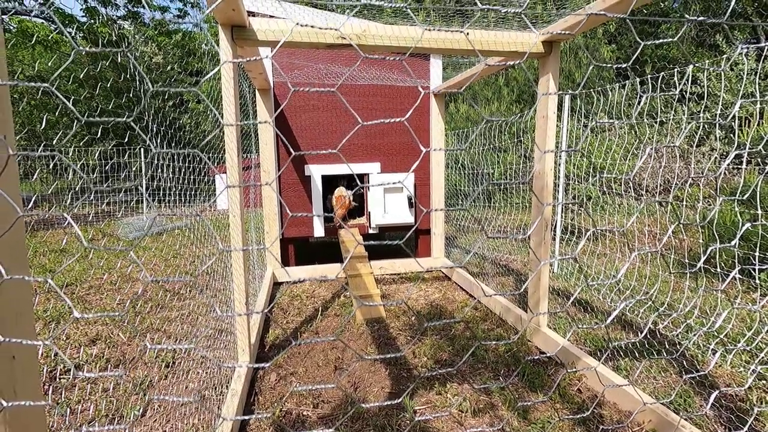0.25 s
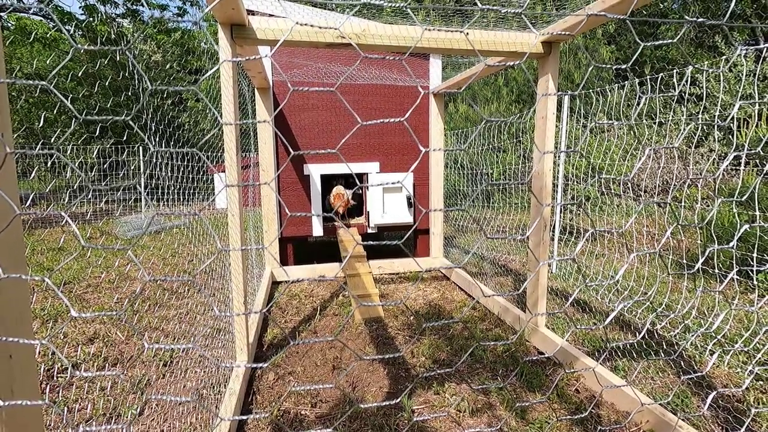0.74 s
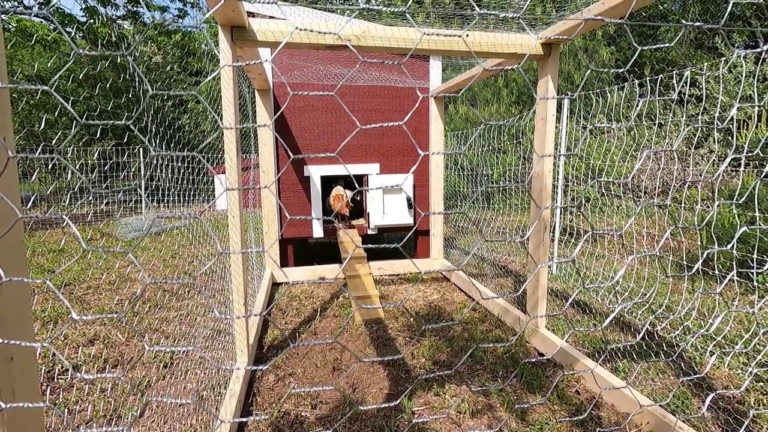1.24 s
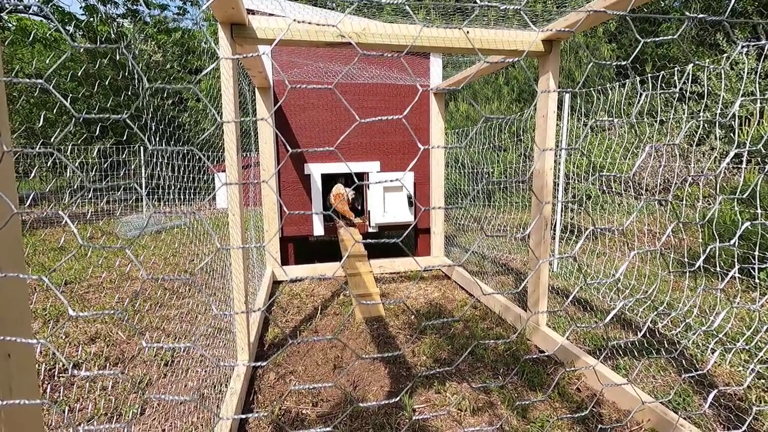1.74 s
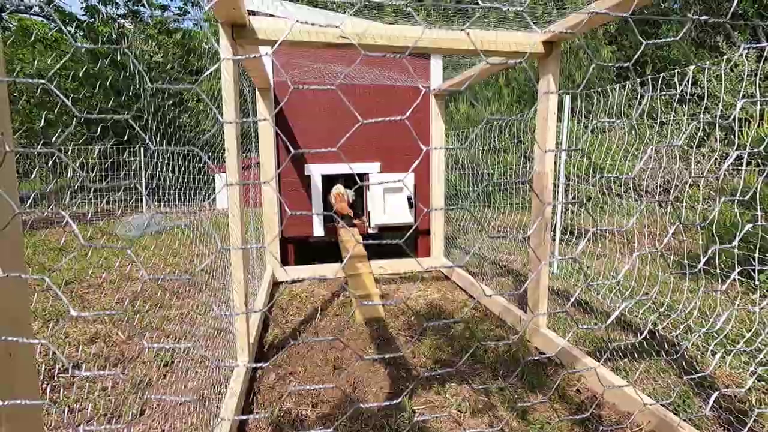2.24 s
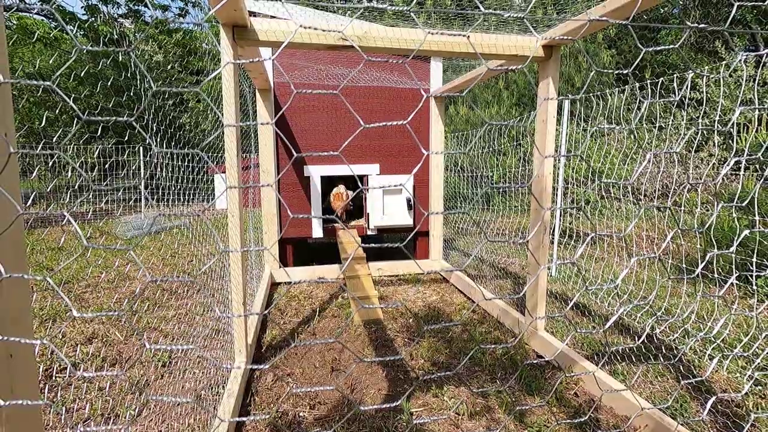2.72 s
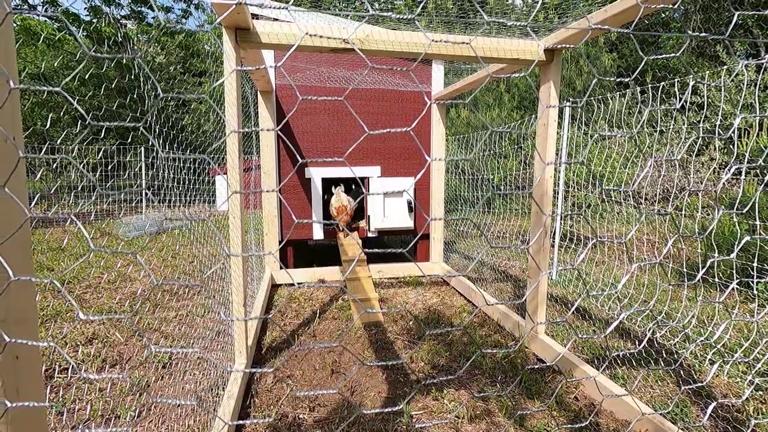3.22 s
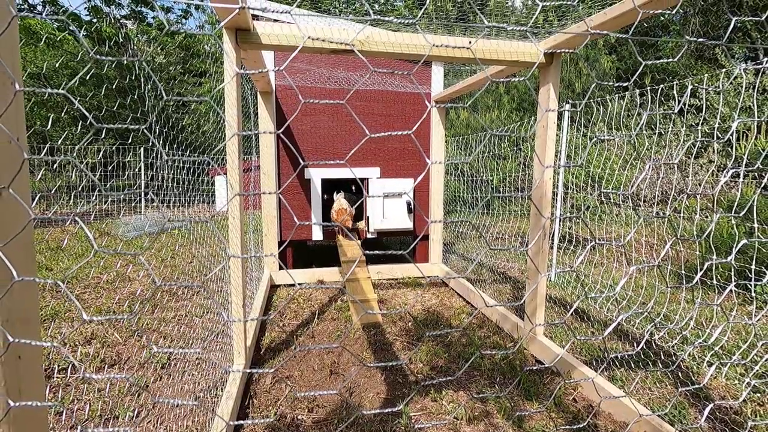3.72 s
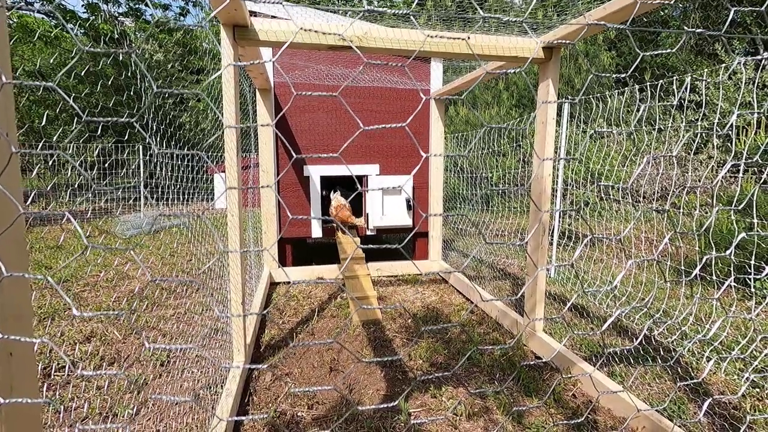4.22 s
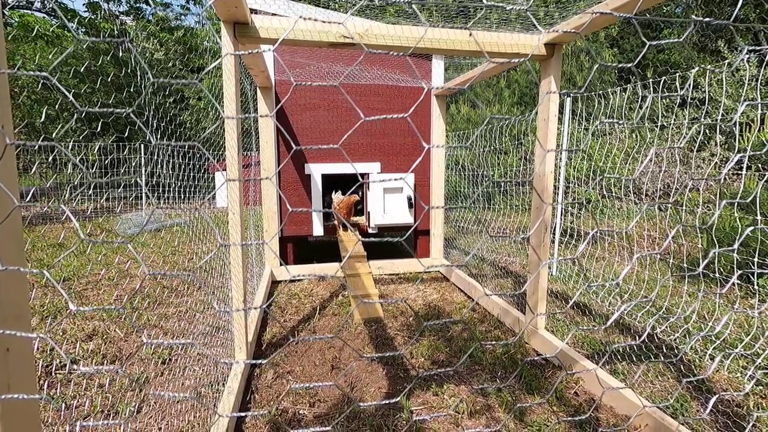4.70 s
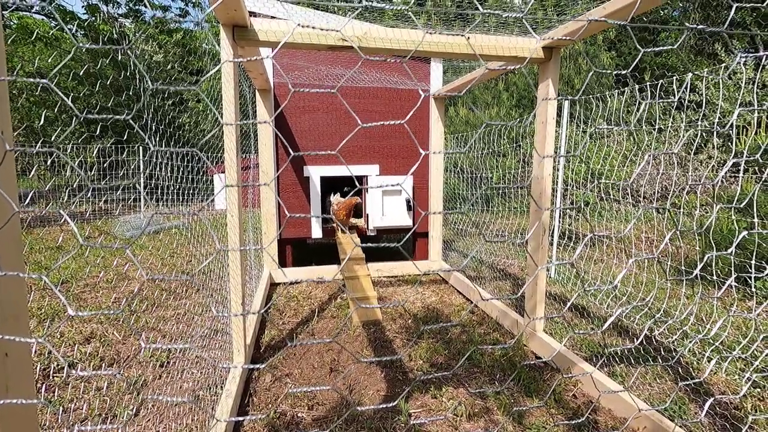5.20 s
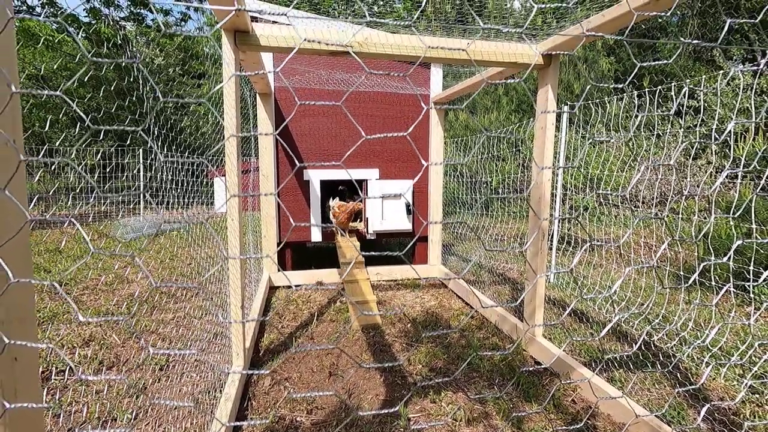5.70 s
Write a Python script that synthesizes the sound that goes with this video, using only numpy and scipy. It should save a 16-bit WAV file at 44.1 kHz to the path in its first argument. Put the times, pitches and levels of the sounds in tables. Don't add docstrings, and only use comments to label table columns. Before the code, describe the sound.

Several young chickens peep outdoors near a wooden coop. Sparse gliding cheeps and chirps come first, then a crowded flurry of falling whistles, hoarse cries and squawks around three seconds, with a woody footstep on the ramp. Calls thin into softer peeps. Crickets pulse continuously, leaves hiss, distant traffic murmurs and wind rumbles on a small camera microphone a few metres away.

```python
import sys
import numpy as np
from scipy import signal
from scipy.io import wavfile
from scipy.ndimage import uniform_filter1d

SR = 44100
rng = np.random.default_rng(int(sys.argv[2]) if len(sys.argv) > 2 else 0)


def nominal_scale(level):
    x = np.asarray(level, float) / 20
    return 10 ** x


def digitize_waveform(pressure):
    field = np.atleast_2d(pressure).T
    bounded = np.clip(field, -1, 1)
    quanta = np.round(bounded * 32767).astype(np.int16)
    wavfile.write(sys.argv[1], SR, quanta)


N = 262388

ARCHES = [
    (1.9, .15, 3770, 2170, -59.5),
    (4.08, .045, 3040, 2800, -53.5),
    (5.768, .118, 3640, 2180, -61),
    (1.672, 0.072, 3584, 3150, -56),
]
PLATEAUS = [
    (2.908, .11, 3550, 3300, -63),
    (3.183, .105, 3290, 2250, -52),
    (5.137, .1, 2944, 2100, -50),
]
BRIGHT_FALLS = [
    (2.33, .105, 3660, 1980, -53),
    (3.124, .058, 3000, 2530, -44.5),
    (4.22, .027, 2540, 2230, -42),
]
FALLS = [(4.078, .1, 3880, 3620, -66), (3.606, .018, 3200, 2950, -50), (2.972, .024, 2820, 2250, -55),
         (3.003, .027, 2260, 2000, -52), (2.99, .034, 3080, 2720, -52), (4.33, .04, 2800, 2380, -54),
         (4.728, .068, 2930, 2520, -51), (4.085, .125, 3450, 2800, -58)]
SAGS = [
    (0.122, 0.185, 3030, 2000, -59.5),
    (3.742, 0.16, 3740, 2140, -57),
    (5.51, 0.105, 3180, 2780, -57),
]
GLIDES = [
    (1.775, .028, 2980, 2400, -60.5),
    (2.712, .056, 3080, 2190, -50),
    (5.908, .034, 2920, 2000, -57.5),
    (4.452, .032, 2460, 1800, -63),
]
CRIES = [
    (2.598, 0.07, 4500, 2300, -50),
    (3.098, .028, 3700, 3030, -50),
    (3.572, 0.036, 4150, 3200, -58),
    (4.61, .036, 3530, 2700, -51),
    (5.45, .07, 3754, 2600, -56),
]
ROUNDS = [
    (4.531, .048, 2700, 2000, -50.5),
    (5.255, .097, 3230, 2410, -54.5),
]
SLIDES = [
    (1.622, 0.118, 3920, 2330, -48),
]
CHEEPS = [
    (0.645, 0.104, 4230, 2330, -47.5),
    (3.015, 0.086, 3420, 2200, -52),
]
HOOKS = [
    (0.912, 0.072, 3160, 2005, -48),
    (1.3, 0.058, 2930, 2073, -41.5),
    (2.104, .066, 2920, 2003, -45.5),
]
DROPS = [(3.18, .015, 2550, 2000, -52), (3.995, .013, 2170, 1920, -55), (4.208, .016, 2800, 2500, -49),
         (3.622, .014, 2950, 2300, -54), (4.244, 0.012, 2230, 1750, -50), (4.481, .016, 1820, 1396, -45),
         (4.678, 0.009, 1482, 950, -47), (4.81, 0.009, 2150, 1950, -47), (4.797, .012, 2500, 2150, -59),
         (5.61, 0.034, 2770, 2200, -47)]
SQUAWKS = [
    (0.12, 0.053, 2120, 1855, -46.5),
    (3.34, .04, 2020, 1653, -44),
]
WAILS = [
    (2.639, .052, 2420, 1620, -43.5),
]
SCOLDS = [(1.165, .035, 2210, 2040, -59), (2.55, 0.067, 4500, 4200, -71), (2.63, 0.083, 3820, 3770, -70),
          (2.655, .03, 4600, 3180, -60), (3.055, 0.059, 4050, 3800, -67.5), (3.32, .045, 4990, 3500, -64),
          (3.362, 0.037, 3370, 2790, -46.5), (3.5, 0.078, 3350, 2900, -62), (2.3, .03, 4080, 3650, -62),
          (3.33, .035, 3150, 3100, -58), (3.408, .014, 2600, 2920, -60), (3.05, .032, 2480, 2250, -54),
          (3.365, .007, 1700, 1550, -46), (5.46, .05, 3450, 2800, -62), (2.635, .03, 4600, 3900, -62),
          (3.55, 0.03, 3800, 3950, -61), (4.617, .048, 3000, 2200, -53), (1.17, .03, 2900, 2600, -63),
          (4.09, .04, 2100, 2000, -66), (4.25, .018, 2050, 2050, -60), (4.656, .02, 3520, 2500, -56),
          (4.68, .007, 3200, 2300, -57)]
TWITTER = [(0.028, .012, 2050, 1970, -55.5), (0.628, .027, 3770, 3740, -69), (.752, 0.029, 1285, 1280, -50),
           (.955, 0.02, 2600, 2520, -59), (1.148, 0.016, 2750, 2520, -57), (2.615, 0.022, 2480, 3150, -62),
           (3.022, .014, 2700, 2400, -60), (4.315, .016, 2600, 2800, -63), (5.25, .012, 2950, 2650, -55),
           (5.508, .014, 2100, 2800, -55), (5.75, .03, 2600, 3600, -63), (5.925, .025, 2100, 1950, -62),
           (3.292, 0.0085, 2750, 3320, -53.5), (3.398, .007, 2480, 2280, -50),
           (3.516, 0.005, 2150, 2050, -47), (3.516, .004, 1550, 1500, -49),
           (3.935, 0.041, 2670, 2350, -60.5), (4.142, .065, 2900, 2400, -60), (4.94, .03, 2173, 2240, -54),
           (4.975, 0.029, 2280, 2236, -52.5), (5.195, 0.021, 1900, 1776, -47.5),
           (5.265, 0.045, 2650, 2380, -61), (5.645, 0.033, 2300, 2290, -59),
           (5.675, 0.041, 2750, 2460, -61), (5.72, 0.022, 2240, 2050, -62), (3.79, .035, 3250, 2230, -61.5),
           (5.862, 0.048, 2980, 2960, -57), (0.001, .018, 2500, 2450, -60), (2.575, .06, 2350, 2170, -63),
           (5.768, .05, 4050, 3900, -70)]


def chicks(waver=.008, flutter_db=1.7, edge_s=.005, effort=.55, rasp_hz=550, lead_s=.025):
    # second harmonic level/dB, step per further harmonic level/dB, rasp level/dB
    kinds = [ (ARCHES, dict(rise=0.118, rise_from=.68, hold=3.0, land=.85, loudest=0.5, start_db=-4, end_db=-7),
             dict(second_db=-21.5, step_db=-15, rasp_db=-32)),
             (PLATEAUS, dict(rise=.17, rise_from=.66, hold=4.5, land=.9, loudest=.4, start_db=-3, end_db=-8),
             dict(second_db=-23, step_db=-15, rasp_db=-32)),
             (BRIGHT_FALLS, dict(rise=.04, rise_from=.97, hold=1.1, land=1.02, loudest=.35, start_db=-3, end_db=-6),
             dict(second_db=-16, step_db=-6, rasp_db=-26)),
             (FALLS, dict(rise=.04, rise_from=.95, hold=1.1, land=1.02, loudest=.35, start_db=-3, end_db=-5),
             dict(second_db=-27, step_db=-12, rasp_db=-24)),
             (CHEEPS, dict(rise=.02, rise_from=1, hold=.85, land=1.45, loudest=.47, start_db=-15, end_db=-10),
             dict(second_db=-20, step_db=-16, rasp_db=-13)),
             (WAILS, dict(rise=.02, rise_from=.99, hold=1.1, land=1.1, loudest=.66, start_db=-4, end_db=-4, crack=.3, crack_hz=2850),
             dict(second_db=-18, step_db=-12, rasp_db=-13)),
             (SAGS, dict(rise=0.1096, rise_from=0.66, hold=1.9, land=.8, loudest=0.45, start_db=-9.5, end_db=-4),
             dict(second_db=-22, step_db=-15.5, rasp_db=-30)),
             (ROUNDS, dict(rise=0.4, rise_from=.77, hold=1.2, land=1.2, loudest=.6, start_db=-5, end_db=-3.5),
             dict(second_db=-19.5, step_db=-10, rasp_db=-26)),
             (SLIDES, dict(rise=0.0187, rise_from=1, hold=.85, land=1.45, loudest=0.47, start_db=-16.5, end_db=-11),
             dict(second_db=-16, step_db=-6.5, rasp_db=-12)),
             (HOOKS, dict(rise=.2, rise_from=.75, hold=.9, land=2.1, loudest=0.9, start_db=-8.5, end_db=-14.5, crack=0.117, crack_hz=2200),
             dict(second_db=-23, step_db=-8, rasp_db=-37)),
             (DROPS, dict(rise=0.016, rise_from=0.99, hold=1.2, land=.85, loudest=0.66, start_db=-14, end_db=-3),
             dict(second_db=-19, step_db=-10, rasp_db=-25)),
             (GLIDES, dict(rise=.02, rise_from=0.93, hold=1.3, land=.75, loudest=0.63, start_db=-6, end_db=-7),
             dict(second_db=-25, step_db=-8, rasp_db=-28)),
             (CRIES, dict(rise=0.023, rise_from=1, hold=1, land=1.02, loudest=0.8, start_db=-11, end_db=-6),
             dict(second_db=-21, step_db=-6, rasp_db=-11)),
             (SQUAWKS, dict(rise=0.106, rise_from=.93, hold=1.1, land=1.29, loudest=0.25, start_db=1, end_db=-3.5, crack=0.304, crack_hz=2920),
             dict(second_db=-30, step_db=-29, rasp_db=-9.5)),
             (SCOLDS, dict(rise=.02, rise_from=.99, hold=1.2, land=1.02, loudest=.55, start_db=-3, end_db=-1.5),
             dict(second_db=-22, step_db=-11, rasp_db=-5)),
             (TWITTER, dict(rise=0.016, rise_from=1, hold=1.03, land=1.02, loudest=0.31, start_db=-4.5, end_db=-4),
             dict(second_db=-28, step_db=-8, rasp_db=-32))]
    out = np.zeros((2, N + SR))
    wavering, fluttering = drift(118), drift(65)
    lowpass = signal.butter(2, rasp_hz, fs=SR, output="sos")
    breath = signal.sosfilt(lowpass, rng.standard_normal((2, N)))
    beak = [drift(18) for k in range(4)]
    breath = rms_one(breath) * nominal_scale(3.6 * drift(140) - 6.0)
    calls = [(*call, shape, voice) for rows, shape, voice in kinds for call in rows]
    pans_db = rng.normal(1.0, 2.2, len(calls))
    for (s, length_s, top_hz, end_hz, peak_db, shape, voice), pan_db in zip(calls, pans_db):
        t = np.arange(max(s - lead_s, 0), min(s + length_s + lead_s, (N - 2) / SR), 1 / SR)
        at = (t * SR).astype(int)
        unsteady = 1 + 6 * nominal_scale(2 * voice["rasp_db"])
        share = np.clip((t - s) / length_s, 0, 1)
        hz, fade_db = contour(share, top_hz, end_hz, **shape)
        smooth_hz = uniform_filter1d(hz, size=140, mode="nearest")
        pitch = smooth_hz * (1 + waver * unsteady * wavering[at])
        phase = 2 * np.pi * np.cumsum(pitch) / SR
        over_db = voice["second_db"] + effort * fade_db
        tone = np.sin(phase)
        for k in range(4):
            overtone_db = over_db + voice["step_db"] * k + 2.26 * beak[k][at]
            tone = tone + nominal_scale(overtone_db) * np.sin((k + 2) * phase)
        edges = np.clip(np.minimum(t - s, s + length_s - t) / edge_s + .5, 0, 1)
        level_db = peak_db + fade_db + flutter_db * unsteady * fluttering[at]
        peep = np.sqrt(2) * tone * edges * nominal_scale(level_db)
        haze = breath[0, at] * np.sin(phase) + breath[1, at] * np.cos(phase)
        peep += haze * nominal_scale(peak_db + voice["rasp_db"]) * np.sqrt(np.hanning(len(t)))
        add(out, t[0], peep * nominal_scale([[pan_db / 2], [-pan_db / 2]]))
    return out[:, :N]


def contour(share, top_hz, end_hz, rise, rise_from, hold, land, loudest, start_db, end_db, crack=0, crack_hz=0):
    # f/Hz, level/dB
    throat = [(1500, 5.5), (2050, 5.5), (2400, 2.5), (2850, 3.5), (3300, 1), (4000, -1.5)]
    falling = np.clip((share - rise) / (1 - rise - crack), 0, 1)
    fall = 1 - (1 - falling ** hold) ** land
    climb = 1 - (1 - rise_from) * np.clip(1 - share / rise, 0, 1) ** 1.57
    hz = top_hz * climb + (end_hz - top_hz) * fall
    if crack:
        hz = hz + (crack_hz - end_hz) * np.clip((share - 1) / crack + 1, 0, 1) ** 1.5
    level_db = np.interp(share, [0, loudest, 1], [start_db, 0, end_db]) + at_hz(throat, hz)
    return hz, level_db - level_db.max()


def litter(grain_db=3.0, peck_t60=0.011, tick_hz=3800, tick_db=4.5):
    # t/s, peak level/dB, length/s
    scratches = [(0.17, -51.5, 0.015), (0.996, -59, 0.014), (4.68, -61, .014), (3.513, -59, .012),
                 (1.182, -55, 0.058), (1.318, -61, 0.05), (2.628, -54.5, 0.067), (2.73, -63, 0.067),
                 (3.113, -55.5, 0.093), (3.36, -59.5, 0.13), (3.4494, -61, 0.13), (3.858, -63, 0.079),
                 (4.085, -52, 0.075), (4.03, -60, .1), (4.165, -56.5, 0.08), (4.446, -62, 0.031),
                 (4.633, -56.5, 0.095), (3.56, -64, .12), (1.52, -63, .04), (5.184, -63, 0.072),
                 (5.482, -61.5, 0.14)]
    # t/s, peak level/dB
    pecks = [(0.177, -61), (1.518, -45.5), (2.685, -58), (1.308, -58), (1.176, -57), (.997, -61),
             (2.7608, -50.5), (2.819, -49.5), (3.019, -48), (3.3478, -58), (3.3744, -65), (5.237, -55)]
    # f/Hz, level/dB per Hz
    grit_colour = [(1200, 2), (4000, -0.5), (8000, -10.5), (13000, -15)]
    scrape, tick = np.zeros(N), np.zeros(N)
    t = np.arange(int(.05 * SR)) / SR
    for s, peak_db, length_s in scratches:
        add(scrape, s - length_s / 3, nominal_scale(peak_db - 2.5) * np.hanning(int(length_s * SR)))
    for s, peak_db in pecks:
        add(tick, s, nominal_scale(peak_db + tick_db - 60 * t / peck_t60))
    grit = banded_noise(grit_colour, patchy_db=1.5, rate=21)
    bright = signal.sosfilt(signal.butter(2, tick_hz, "high", fs=SR, output="sos"), grit)
    return nominal_scale(grain_db * drift(280)) * (scrape * grit + tick * bright)


def ramp():
    # t/s, peak level/dB
    knocks = [
        (3.346, -33),
        (3.515, -41),
        (4, -52),
    ]
    # f/Hz, level/dB, t60/s
    modes = [(343, -11, 0.046), (600, 2.5, 0.01), (1100, -18, 0.02)]
    out = np.zeros(N)
    t = np.arange(int(.1 * SR)) / SR
    for s, peak_db in knocks:
        for hz, db, t60 in modes:
            add(out, s, nominal_scale(peak_db - 10.5 + db - 60 * t / t60) * np.sin(2 * np.pi * hz * t))
    return out


def coop(x, t60=.1, wet_db=-7.5):
    t = np.arange(int(.2 * SR)) / SR
    echoes = rng.standard_normal((2, len(t))) * nominal_scale(-60 * t / t60) * (t > .002)
    echoes /= np.sqrt(np.sum(echoes ** 2, axis=1, keepdims=True))
    return x + nominal_scale(wet_db) * signal.fftconvolve(x.mean(axis=0)[None], echoes, axes=1)[:, :N]


def crickets(stroke_gap_s=0.041, stroke_s=.026, top_hz=5060, fall_hz=350, chorus_db=-73,
             strokes_db=(-2.5, .1, -3)):
    # t/s, chirp level/dB
    chirps = [(0.081, -66), (0.34, -60.5), (0.595, -62), (0.857, -60.5), (1.122, -67), (1.312, -63.5),
              (1.583, -62.5), (1.812, -65.5), (2.034, -66), (2.375, -62.5), (2.583, -61.5), (2.829, -62.5),
              (3.061, -61.5), (3.284, -61.5), (3.529, -59.5), (3.79, -61.5), (3.968, -61.5), (4.235, -60),
              (4.482, -61.5), (4.712, -64), (4.942, -67), (5.164, -66), (5.394, -64), (5.634, -65.5),
              (5.821, -64)]
    near = np.zeros(N)
    t = np.arange(int(stroke_s * SR)) / SR
    share = t / stroke_s
    phase = 2 * np.pi * np.cumsum(top_hz - fall_hz * share ** 2) / SR
    stroke = np.sin(np.pi * share) * np.sin(phase)
    for (s, chirp_db), uneven_db in zip(chirps, rng.normal(0, 1.3, (len(chirps), 3))):
        for k, db in enumerate(strokes_db + uneven_db):
            add(near, s - stroke_s / 2 + k * stroke_gap_s, nominal_scale(chirp_db + db - 4.0) * stroke)
    throb = drift(29)
    swell = 2.93 * rms_one(uniform_filter1d(np.abs(near), size=3000))
    out = near * nominal_scale(1.9 * drift(290) + 4.5)
    for low_hz, high_hz, band_db in (4925, 5130, -3.5), (4580, 5250, -0.9):
        noise = rng.standard_normal((3, N))
        band = signal.butter(2, [low_hz, high_hz], "band", fs=SR, output="sos")
        far = signal.sosfilt(band, noise[0] + .5 * noise[1:])
        out = out + nominal_scale(chorus_db + band_db + 3.2 * throb + swell) * rms_one(far)
    return out


def road():
    # t/s, whoosh level/dB, drone level/dB
    passes = [
        (.16, -58, -68),
        (0.33, -51.5, -57),
        (1.6, -63, -56.5),
        (2.65, -62.5, -56.5),
        (4.05, -55, -56.5),
        (5.25, -66.5, -57.5),
    ]
    # t/s, level/dB
    roar = [(0, -55), (1.6, -52), (3.1, -58), (5.95, -66)]
    # f/Hz, level/dB per Hz
    tyre_colour = [(600, -19.5), (850, -6.5), (1100, 3.5), (1450, -2), (2100, -11), (3600, -30)]
    drone_colour = [(130, -8.5), (210, 0.5), (300, -9), (430, -36.5)]
    whoosh_colour = [(330, -16.5), (500, -3.5), (800, -2.5), (1600, -18.5)]
    s, whoosh_db, drone_db = np.transpose(passes)
    whoosh = swells(s, whoosh_db, rest_db=-67.5, rise_db_per_s=55.5, fall_db_per_s=22.5)
    drone = swells(s, drone_db, rest_db=-65.5, rise_db_per_s=55.5, fall_db_per_s=22.5)
    roar_gain = np.hypot(nominal_scale(in_time(roar)[0]), nominal_scale(-1) * whoosh)
    out = roar_gain * banded_noise(tyre_colour, patchy_db=1.62, rate=9.5)
    out += drone * nominal_scale(3.0) * banded_noise(drone_colour, patchy_db=0.8, rate=0.53)
    out += whoosh * banded_noise(whoosh_colour, patchy_db=3.5, rate=2.7) * nominal_scale([[.8], [-.8]])
    return out * nominal_scale([[.4], [-.4]])


def engine(half_db=0.0):
    # t/s, f/Hz, level/dB
    hum_curve = [(0, 152, -63), (1.8, 154, -56.5), (3.4, 151.3, -55.5), (3.9, 148.9, -67.5),
                 (4.3, 152, -54), (4.8, 158, -52.5), (5.2, 163, -52), (5.6, 163, -53), (5.95, 163, -65)]
    hz, level_db = in_time(hum_curve)
    phase = 2 * np.pi * np.cumsum(hz * (1 + 0.01595 * drift(3.91))) / SR
    hum = np.sin(phase) * nominal_scale(2.5 * drift(9.0))
    hum += nominal_scale(half_db + 2.0 * drift(4.4)) * np.sin(phase / 2)
    return np.sqrt(2) * nominal_scale(level_db) * hum


def leaves():
    # t/s, rustle level/dB
    breeze = [(0, -72.5), (1.3, -69), (1.9, -73), (2.7, -68.5), (4.1, -68), (4.9, -70.5), (5.95, -67.5)]
    # f/Hz, level/dB per Hz
    rustle_colour = [(1180, 4), (2000, 0.5), (2770, -3.5), (3960, -8.5), (5030, -8), (6000, -10),
                     (11700, -26.5), (13400, -55)]
    return nominal_scale(in_time(breeze)[0] + 6) * banded_noise(rustle_colour, patchy_db=1.2, rate=8)


def wind():
    # t/s, peak rumble level/dB
    gusts = [(0.28, -44), (0.7, -38.5), (1.15, -38.5), (1.78, -39.5), (2.15, -47), (2.6, -51), (3.15, -42),
             (3.65, -45), (4.25, -41.5), (4.62, -44), (5.1, -62), (5.3, -40.5), (5.65, -39.5),
             (5.85, -37.5)]
    # f/Hz, level/dB per Hz
    wind_colour = [(11, -51), (18, -7.5), (43, 1), (65, 5.5), (124, -5.5), (170, -10), (220, -28),
                   (370, -120)]
    gain = swells(*np.transpose(gusts), rest_db=-48.5, rise_db_per_s=55.5, fall_db_per_s=73)
    return gain * banded_noise(wind_colour, patchy_db=2.5, rate=20.0)


def banded_noise(spectrum, patchy_db, rate):
    # f/Hz, correlation [0-1]
    likeness = [(60, .999), (125, .992), (250, .88), (500, .6), (1000, .68), (4000, .62), (8000, .66),
                (12000, .1)]
    edges = 2 ** np.arange(np.log2(spectrum[0][0]), np.log2(spectrum[-1][0]) + .1, 1 / 3)
    white = rng.standard_normal((2, 2, N + SR // 4))
    out = 0
    for k, (low, high) in enumerate(zip(edges, edges[1:])):
        band = signal.butter(2, [low, high], "band", fs=SR, output="sos")
        mid, side = signal.sosfilt(band, white[k % 2])[:, SR // 4:]
        hz = np.sqrt(low * high)
        alike = np.clip(at_hz(likeness, hz), 0, 1)
        gain = nominal_scale(at_hz(spectrum, hz) + patchy_db * drift(rate))
        out = out + gain * (np.sqrt(1 + alike) * mid + np.sqrt(1 - alike) * side * [[1], [-1]])
    return rms_one(out)


def swells(s, peak_db, rest_db, rise_db_per_s, fall_db_per_s):
    coarse = np.arange(0, N, 64)
    late = coarse[:, None] / SR - np.array(s)
    slope = np.where(late < 0, rise_db_per_s, -fall_db_per_s)
    power = nominal_scale(np.array(peak_db) + slope * late) ** 2
    return np.interp(np.arange(N), coarse, np.sqrt(power.sum(axis=1) + nominal_scale(rest_db) ** 2))


def drift(rate):
    r = np.exp(-40 * np.pi * rate / SR)
    slow = signal.lfilter([1], [1, -2 * r, r * r], rng.standard_normal(N // 20 + 4002))[4000:]
    return np.interp(np.arange(N) / 20, np.arange(len(slow)), rms_one(slow))


def rms_one(x):
    return x / np.sqrt(np.mean(x ** 2) + 1e-20)


def in_time(rows):
    s, *columns = np.transpose(rows)
    return [np.interp(np.arange(N) / SR, s, c) for c in columns]


def at_hz(points, hz):
    table_hz, value = np.array(points).T
    return np.interp(np.log(hz), np.log(table_hz), value)


def add(out, s, sound):
    i = int(round(s * SR))
    out[..., i:i + sound.shape[-1]] += sound[..., :N - i]


def scene():
    hiss = litter() + leaves()
    hiss = signal.sosfilt(signal.cheby2(10, 30, 13250, fs=SR, output="sos"), hiss)
    return coop(chicks() + crickets() + ramp()) + hiss + wind() + road() + engine()


def roll_off(x):
    return signal.sosfilt(signal.butter(12, 13540, fs=SR, output="sos"), x)


def record(dry):
    return roll_off(dry)


dry = scene()
out = record(dry)
digitize_waveform(out)
```